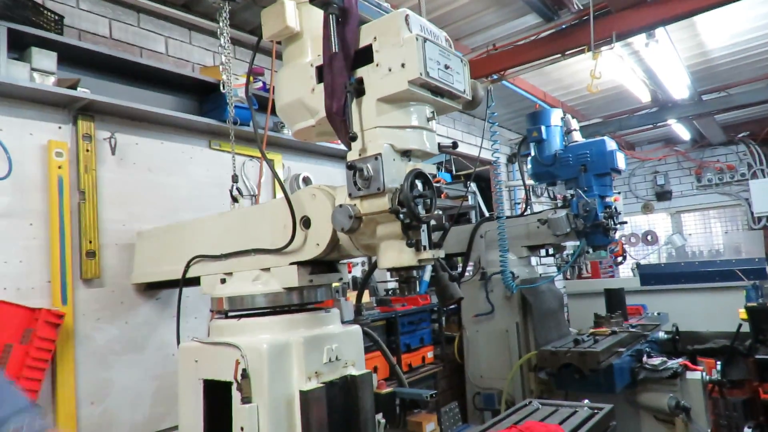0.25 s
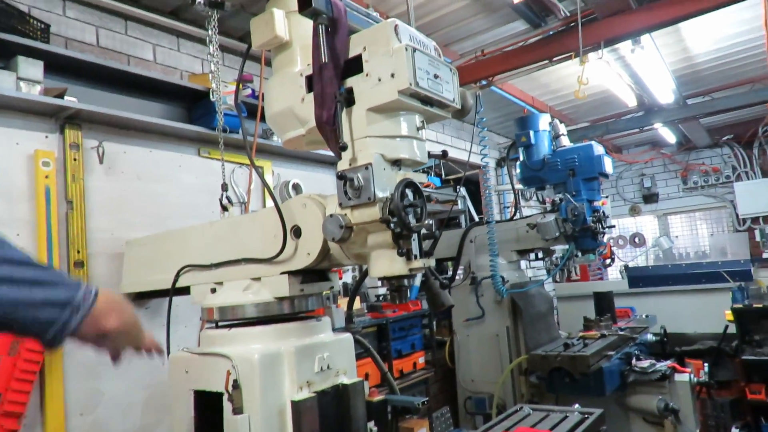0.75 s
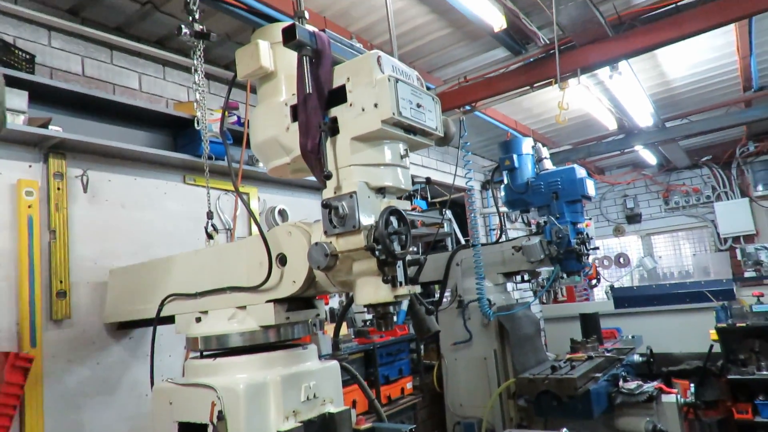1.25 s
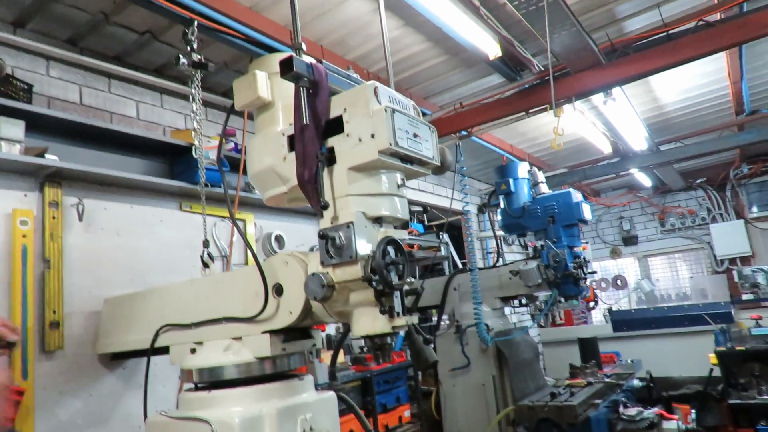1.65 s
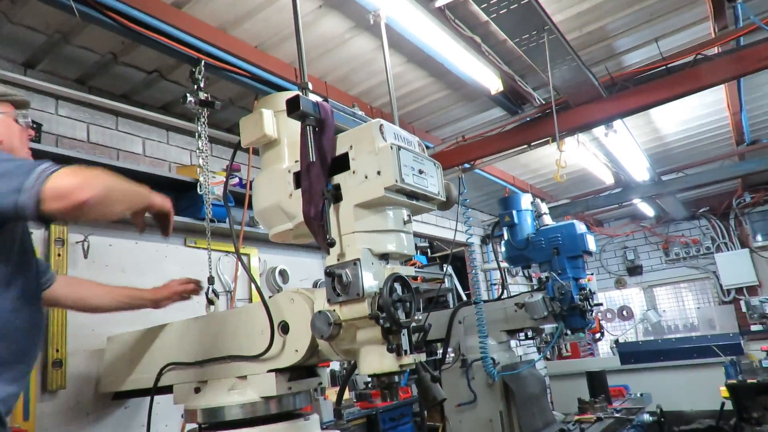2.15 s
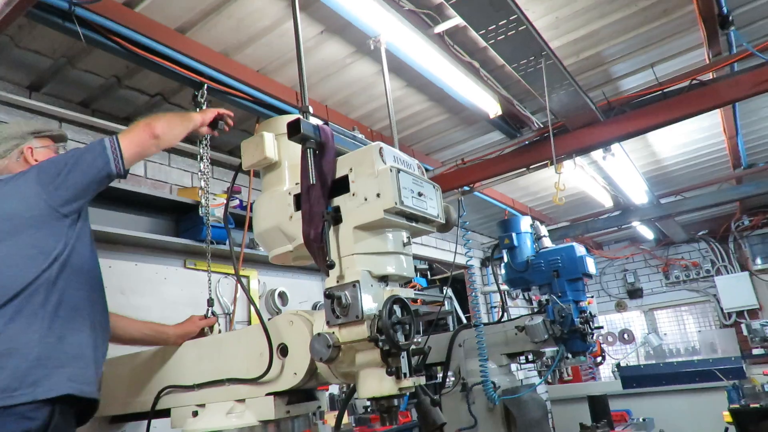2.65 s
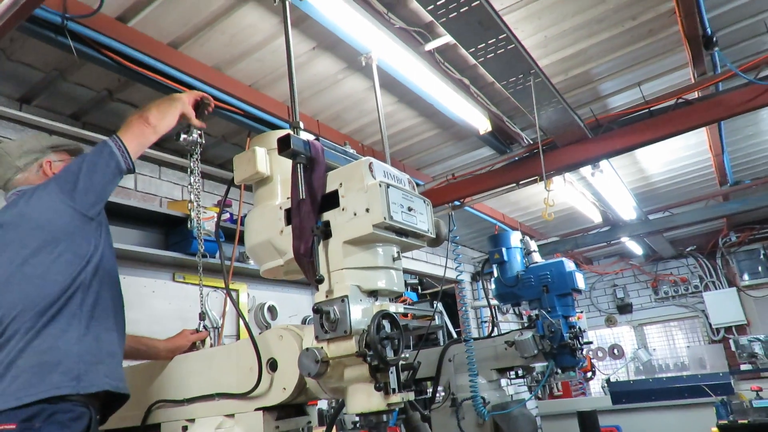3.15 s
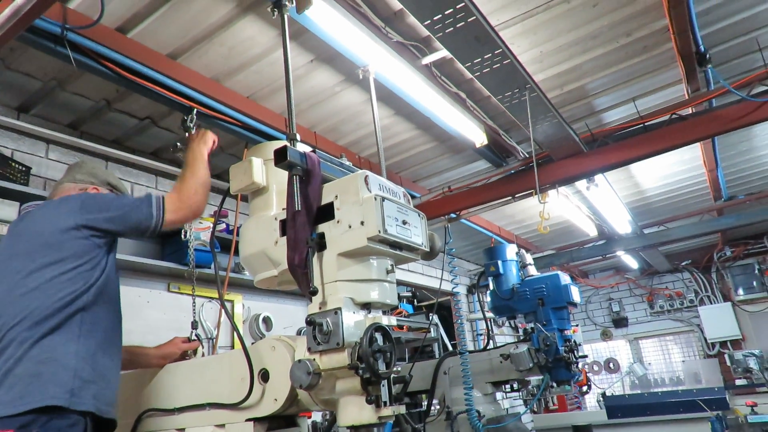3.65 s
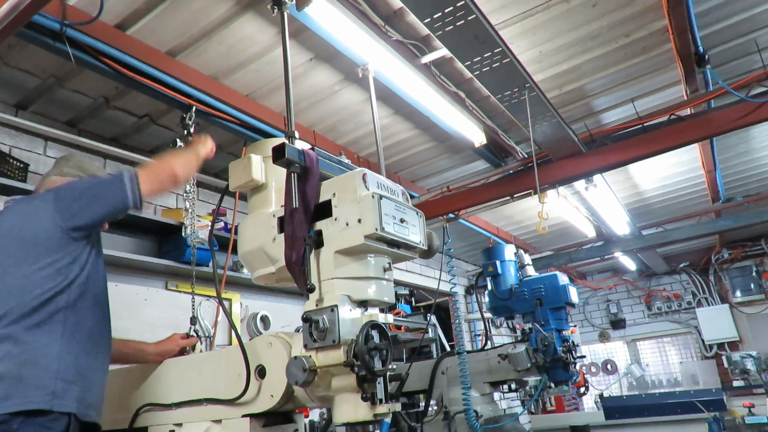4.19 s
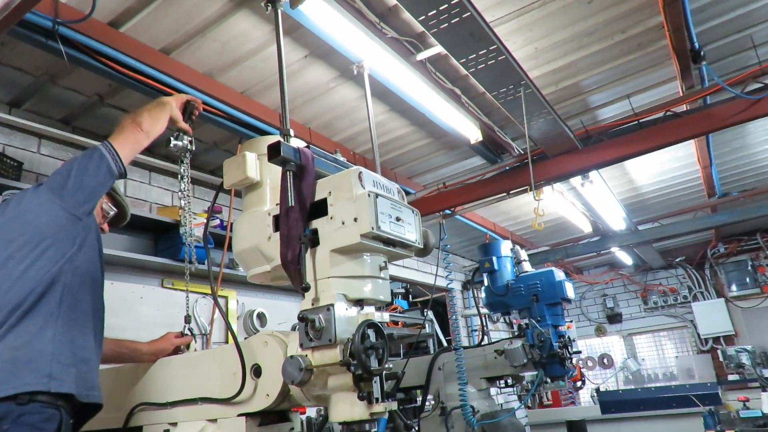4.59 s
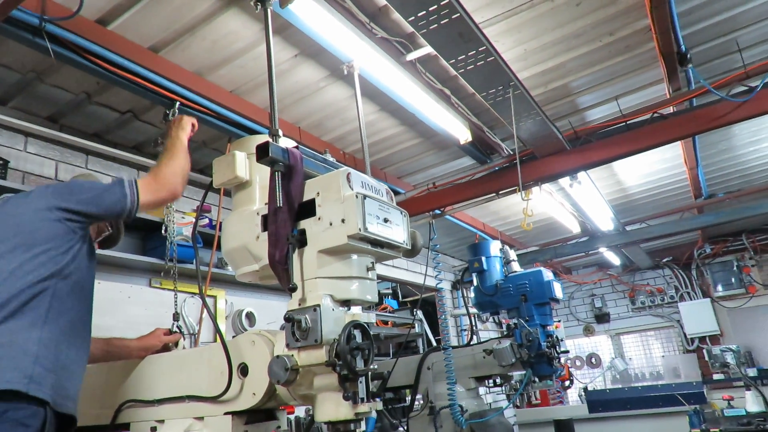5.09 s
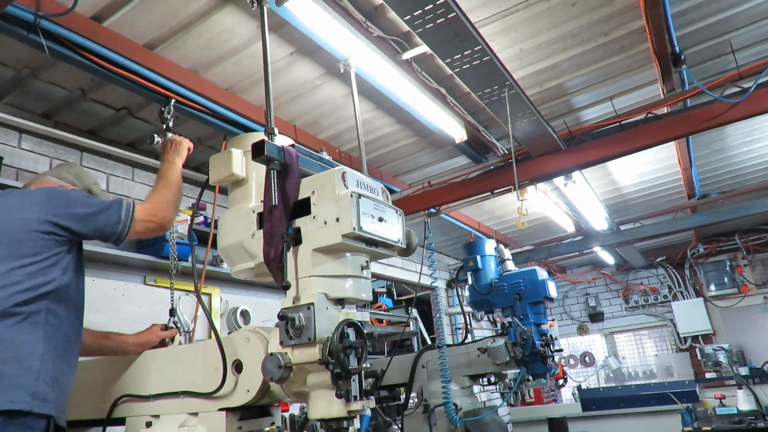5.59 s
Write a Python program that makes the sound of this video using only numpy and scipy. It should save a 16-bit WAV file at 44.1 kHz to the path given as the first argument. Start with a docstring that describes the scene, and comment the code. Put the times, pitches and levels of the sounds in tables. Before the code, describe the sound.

A hard-walled workshop with faint low strip-light hum and soft wide hiss that grow slightly. A dull knock comes at 0.25 s, then a sharper, louder one at 0.8 s, with light cloth rustle around them. At 1.4 s a muffled knock and short gritty scrape. Around 2 s a soft thud and scuff, then faint chain ticks. From 2.9 to 3.0 s chain links snap brightly, ringing briefly in the room, followed by lighter rattles to 3.5 s. At 3.75 to 3.9 s a scrape leads into a heavy hook clank, low and clangy, with a deep boom and blurred murmur-like tail. Quick sharp clicks at 4.35, 4.41 and 4.46 s, then a heavier one at 4.6 s with a low jolt. A lull, small bright chain clicks from 5.15 to 5.5 s, and a dull knock with low thump at 5.65 s. Close stereo pickup, about two metres away.

```python
"""Dull knocks come first, over hum, hiss and a low murmur; then chain links snap and a hook clanks.
A small chain hoist is worked by hand in a hard workshop, two metres from a pair of close microphones.
Each blow is a burst of noisy contact plus ringing modes; the contact spreads through the room.
Scrapes are dense ticks. Rumble, murmur, scuffs, rustle and air are coloured noise; the hum is a sine."""
import sys
import numpy as np
from scipy import signal
from scipy.fft import rfft, irfft, next_fast_len
from scipy.io import wavfile
from scipy.ndimage import uniform_filter1d

SR = 44100
rng = np.random.default_rng(int(sys.argv[2]) if len(sys.argv) > 2 else 0)


def to_wav(sig):
    """Store sig (one row per channel, or 1-D mono) as 16-bit WAV at the path in sys.argv[1].

    Samples outside -1..1 are clipped; the rate is SR.
    """
    pcm = np.clip(np.atleast_2d(sig), -1, 1) * 32767
    pcm = np.round(pcm).astype(np.int16)
    wavfile.write(sys.argv[1], SR, pcm.T)  # frames by channels


N = 257058
TIME = np.arange(N) / SR  # seconds
TAIL = np.arange(2 ** 15) / SR  # seconds after a blow


def undb(db):
    """Turn decibels into gain."""
    return 10 ** (np.asarray(db) / 20)


def unit(x):
    """Scale to rms 1."""
    return x / np.sqrt(np.mean(x ** 2))


def unit_energy(x):
    """Scale to energy 1."""
    return x / np.sqrt(np.sum(x ** 2))


def fade(t60):
    """Exponential decay, 60 dB down after t60 seconds."""
    return np.exp(-np.log(1000) * TAIL / max(t60, 1 / SR))


def read(points, hz):
    """Read between (Hz, value) points on a log-frequency axis."""
    f, value = np.transpose(points)
    return np.interp(np.log(np.maximum(hz, 1)), np.log(f), value)


def colour(x, points):
    """Filter with the gain of (Hz, dB) points; folding the cepstrum makes it respond only after its input."""
    n = next_fast_len(len(x) + 4096, True) // 2 * 2
    gain = undb(read(points, np.fft.rfftfreq(n, 1 / SR)))
    cepstrum = irfft(np.log(gain))
    cepstrum[1:n // 2] *= 2
    cepstrum[n // 2 + 1:] = 0
    response = np.exp(rfft(cepstrum))
    return irfft(rfft(x, n) * response)[:len(x)]


def split(x, edges):
    """Cut x into the parts between neighbouring band edges."""
    hz, spectrum = np.fft.rfftfreq(len(x), 1 / SR), rfft(x)
    return [irfft(spectrum * (hz >= lo) * (hz < hi), len(x)) for lo, hi in zip(edges, edges[1:])]


def walk(rate):
    """Smooth random wander with a spread near 1, drawing 'rate' new values per second."""
    k = int(SR / rate)
    steps = np.repeat(rng.standard_normal(N // k + 1), k)
    return 1.2 * uniform_filter1d(steps, k)[:N]


# How much the two microphones differ.
# Each row: frequency in Hz, gain of the difference signal in dB.
WIDTH = [(60, -64), (250, -29.5), (600, -20), (1400, -17), (2800, -15), (5500, -9), (9500, -2.5),
         (13500, 0.5)]


def ports(mid, side):
    """Two close microphones hear the same bass and differing treble."""
    return mid + np.array([[1], [-1]]) * colour(side, WIDTH)


def wash(points, db):
    """Diffuse noise of one colour, at a steady or moving level."""
    return ports(*(unit(colour(rng.standard_normal(N), points)) * undb(db) for _ in range(2)))


# Colour of the still air, then of the hiss that differs at the two microphones.
# Each row: frequency in Hz, relative level in dB.
AIR = [(20, -30), (50, -27), (100, 5), (160, -7.5), (420, -10), (900, -13), (2000, -32), (4000, -24.5),
       (8000, -31.5), (14000, -43), (16000, -80)]
HISS = [(30, -21), (110, -20), (220, -2), (450, 5), (900, -0.5), (2000, -5), (4000, -15.5), (8000, -25),
        (14000, -29), (16000, -60)]
AIR_DB = -62
HUM_HZ, HUM_DB, HUM_WAVER_DB = 99.5, -62, -0.5  # hum level before the swell
HISS_DB = -56.5  # before the swell
SWELL_RISE_DB_PER_S = 0.95
SWELL_START_DB, SWELL_SETTLE_S = -4, 0.27  # hum and hiss start softer


def background():
    """Still air, the wavering sine hum of the strip lights and a wide hiss; hum and hiss slowly grow."""
    hum = np.sqrt(2) * np.sin(2 * np.pi * HUM_HZ * TIME) * undb(HUM_DB + HUM_WAVER_DB * walk(11))
    hiss = np.array([unit(colour(rng.standard_normal(N), HISS)) for _ in range(2)])
    start_dip_db = SWELL_START_DB * np.clip(1 - (TIME / SWELL_SETTLE_S) ** 2, 0, 1)
    swell_db = SWELL_RISE_DB_PER_S * TIME + start_dip_db
    return wash(AIR, AIR_DB) + (hum + hiss * undb(HISS_DB)) * undb(swell_db)


def strokes(table):
    """Gain of rubbing strokes: each swells and dies in a rounded arch."""
    gain = 0
    for start, length_s, db in table:
        progress = np.clip((TIME - start) / length_s, 0, 1)
        gain = gain + undb(db) * np.sqrt(np.sin(np.pi * progress))
    return gain


# Level of the low rumble and murmur, including the blurred tails of blows,
# strongest just after the hook's clank.
# Each row: time in seconds, rumble in dB, murmur in dB (both before the trims below).
MURMUR_LEVELS = [(0.0, -92, -60.5), (0.36, -85, -50.5), (2.74, -68.5, -56), (2.99, -63.5, -47),
                 (3.7, -73, -57), (3.98, -53, -25.5), (4.07, -60.5, -44.5), (5.45, -63, -45.5),
                 (5.83, -55.5, -47)]
# Soft scuffs, then sleeves rustling as the arms reach.
# Each row: start in seconds, length in seconds, level in dB before the noise wavers.
SCUFFS = [(0.553, 0.072, -49.5), (2.06, 0.11, -39), (3.745, .11, -39.5), (4.47, 0.11, -38.5),
          (4.65, 0.25, -49), (5.15, 0.213, -46)]
RUSTLES = [(0.33, 0.64, -54), (1.55, 0.37, -58), (2.0, 0.45, -55), (3.02, 0.096, -43), (4.49, 0.13, -40)]
# Colours of the rumble (the load booms with it too), the murmur (scuffs share it) and the rustle.
# Each row: frequency in Hz, relative level in dB.
RUMBLE = [(20, -15), (40, -14), (56, -16.5), (71, -2.5), (85, -6.5), (125, -2.5), (160, -9), (220, -7),
          (500, -67)]
MURMUR = [(90, -29.5), (170, 1), (250, 4), (360, 2.5), (550, -2.5), (900, -12.5), (2500, -70)]
RUSTLE = [(400, -4.5), (900, 7), (2000, 0.5), (4000, -6.5), (8000, -17.5), (15000, -23)]
RUMBLE_TRIM_DB, MURMUR_TRIM_DB, RUSTLE_TRIM_DB = 10.5, -3.5, -12


def murmur():
    """Uneven coloured noise: low rumble and murmur with blurred tails of blows, scuffs and sleeves."""
    s, *columns = np.transpose(MURMUR_LEVELS)
    rumble_db, murmur_db = (np.interp(TIME, s, c) for c in columns)
    rumble = wash(RUMBLE, rumble_db + RUMBLE_TRIM_DB + 1.7 * walk(27))
    murmur_gain = undb(murmur_db + MURMUR_TRIM_DB) + strokes(SCUFFS)
    murmur_and_scuffs = murmur_gain * wash(MURMUR, 1.84 * walk(50))
    # brighter noise follows the murmur's level, besides the sleeve strokes
    rustle_gain = undb(murmur_db + RUSTLE_TRIM_DB) + strokes(RUSTLES)
    rustle = rustle_gain * wash(RUSTLE, 2.33 * walk(25.21))
    return rumble + murmur_and_scuffs + rustle


# The heavy load is jolted.
# Each row: start in seconds, level in dB before the noise wavers.
JOLTS = [(1.965, -52), (3.865, -33), (4.02, -41), (4.62, -38), (5.66, -42.5)]
JOLT_ATTACK_S, JOLT_HOLD_S, JOLT_FALL_DB_PER_S = 0.03, 0.03, 87


def load():
    """Each jolt of the load booms as low noise, holds for a moment and dies away."""
    gain = 0
    for s, db in JOLTS:
        attack = np.clip((TIME - s) / JOLT_ATTACK_S, 0, 1)
        falling_s = np.maximum(TIME - s - JOLT_ATTACK_S - JOLT_HOLD_S, 0)
        gain = gain + attack * undb(db - JOLT_FALL_DB_PER_S * falling_s)
    return gain * wash(RUMBLE, 0.5 * walk(14))


# How long the workshop reverberates.
# Each row: frequency in Hz, time to fall by 60 dB in seconds.
ROOM_T60 = [(100, 0.39), (400, 0.44), (1000, 0.36), (2700, 0.43), (7000, 0.32), (14000, 0.23)]


def room_decay():
    """Octave edges, and how the reverberation fades in each octave."""
    edges = np.r_[0, 180 * 2 ** np.arange(7), SR / 2]
    return edges, np.array([fade(t60) for t60 in read(ROOM_T60, edges[1:] / np.sqrt(2))])


def workshop(direct_db, early_db, early_s):
    """Paths from one spot: straight, off nearby machines and walls, then a diffuse tail that builds up."""
    edges, decay = room_decay()
    octaves = split(rng.standard_normal(len(TAIL)), edges)
    diffuse = np.sum(octaves * decay, axis=0) * (1 - fade(0.052))
    # about 1800 scattered reflections a second, dying away
    reflected = rng.random(len(TAIL)) < 1800 / SR
    early = rng.standard_normal(len(TAIL)) * reflected * fade(early_s)
    response = unit_energy(diffuse) + undb(early_db) * unit_energy(early)
    response[0] += undb(direct_db)
    return unit_energy(response)


# Slack chain and fittings dragged over metal.
# Each row: start in seconds, length in seconds, level of the ticks in dB before body and room.
SCRAPES = [(1.351, 0.11, -47), (1.439, 0.14, -38.5), (2.059, 0.052, -52), (2.719, 0.24, -51.5),
           (3.205, 0.087, -49), (3.577, 0.036, -53.5), (3.785, 0.086, -40), (4.07, 0.034, -36.5),
           (4.28, 0.2, -49), (4.834, 0.024, -48), (4.885, 0.045, -52)]
# Colour of the scraping. Each row: frequency in Hz, relative level in dB.
SCRAPE = [(120, -31), (350, 6), (900, 7.5), (2200, 7), (4500, -3.5), (7000, -12), (13500, -19.5),
          (15500, -41)]


def scrapes():
    """Metal catches and slips in dense uneven ticks that the room smears."""
    ticks = np.zeros(N)
    for s, length_s, db in SCRAPES:
        n = int(length_s * SR)
        caught = rng.random(n) < 700 / SR  # about 700 ticks a second
        slips = rng.standard_normal(n) * caught * signal.windows.tukey(n, .5)
        i = int(s * SR)
        ticks[i:i + n] += unit(slips) * undb(db)
    body = unit_energy(colour(signal.unit_impulse(1024), SCRAPE))
    sound = signal.fftconvolve(ticks, body)
    place = dict(direct_db=-4, early_db=7, early_s=0.13)
    return ports(*(signal.fftconvolve(sound, workshop(**place))[:N] for _ in range(2)))


# Edges in Hz of the five registers: thump, body, clang, clink, tick.
BAND_EDGES = [50, 200, 750, 1400, 5000, 15000]


def blow(band_db, chatter_s, ring_db, striker_hz, modes, crack, paths):
    """One contact chatters for a moment and rings the modes, each by the place where it is struck."""
    contact = unit_energy(rng.laplace(size=len(TAIL)) * fade(chatter_s))
    contact[0] += .8
    # the part that strikes adds one damped resonance of its own
    contact = contact + .8 * signal.lfilter(*signal.iirpeak(striker_hz, 14, fs=SR), contact)
    contact = colour(unit_energy(contact), crack)
    # a random strength for each mode stands for the place struck
    strength = undb(ring_db + 2.0 * rng.standard_normal(len(modes)))

    def arrival():
        """The crack spreads through the room; each mode arrives in its own phase."""
        ring = 0
        for gain, (hz, db, t60) in zip(strength, modes):
            tone = np.sin(2 * np.pi * (hz * TAIL + rng.random())) * fade(t60)
            ring = ring + gain * undb(db) * unit_energy(tone)
        spread = signal.fftconvolve(contact, workshop(*paths))[:len(TAIL)]
        return spread + ring * (1 - fade(0.034))

    mid, side = arrival(), arrival()
    # force and hardness of the contact set how strong each register starts
    attack = int(.025 * SR)
    start_db = [10 * np.log10(np.mean(part[:attack] ** 2)) for part in split(mid, BAND_EDGES)]
    centres = np.sqrt(np.multiply(BAND_EDGES[1:], BAND_EDGES[:-1]))
    hardness = np.c_[centres, np.subtract(band_db, start_db)]
    return np.array([colour(mid, hardness), colour(side, hardness)])


RING_DB_PER_LEVEL_DB, AVERAGE_BLOW_DB = 0.21, -22.5  # stronger blows set the modes ringing more


def blows(table, modes, crack, voice_db, clang_share, ring_db, direct_db, early_db, early_s):
    """All blows on one object: weight brings in the lower registers, hardness the tick."""
    out = np.zeros((2, N + len(TAIL)))
    paths = direct_db, early_db, early_s
    for s, db, weight_db, hard_db, chatter_s, striker_hz in table:
        # a light touch sounds mostly in the clink, which neither changes
        tilt_db = [weight_db, weight_db, clang_share * weight_db, 0, hard_db]
        band_db = db + np.add(voice_db, tilt_db)
        force_db = RING_DB_PER_LEVEL_DB * (band_db.max() - AVERAGE_BLOW_DB)
        i = int(s * SR)
        sound = blow(band_db, chatter_s, ring_db + force_db, striker_hz, modes, crack, paths)
        out[:, i:i + len(TAIL)] += sound
    return ports(*out[:, :N])


# Duller knocks on bench and machine casing.
# Each row: start in seconds, level in dB before the voice below, weight in dB, hardness in dB,
# chatter decay in seconds, note of the striking part in Hz.
KNOCKS = [(0.169, -40.5, -0.5, -9, 0.099, 264), (0.258, -22.5, -21.5, -8.5, 0.042, 1780),
          (0.809, -13, -9, 3.5, 0.016, 2580), (1.409, -29, 2, 0.5, 0.047, 370),
          (1.969, -44.5, 17.5, -2, 0.12, 400), (2.399, -48, 5.5, 0.5, 0.018, 427),
          (5.631, -28, -4.5, -4.5, 0.096, 1150)]
# Modes of the casing. Each row: frequency in Hz, relative level in dB, 60 dB decay in seconds.
CASING = [(185.5, -3.5, 0.25), (293.5, 4.5, 0.18), (332, 8, 0.16), (378.5, 9.5, 0.069), (490, 2.5, 0.12),
          (572, 5, 0.24), (725, 2, 0.14), (1070, -5, 0.35), (1206, -3, 0.17), (1530, 1, 0.23),
          (1770, -18, 0.084), (2250, -12, 0.15), (2650, -10, 0.38)]
# Colour of the contact noise. Each row: frequency in Hz, relative level in dB.
CASING_CRACK = [(40, -33), (110, -8), (180, -5), (330, -4.5), (480, 0.5), (700, 2), (1500, 4.5), (2000, -1),
                (2700, -3), (4500, 0), (6000, -5.5), (8000, -9), (10000, -16), (13000, -21), (15500, -35)]
# Registers before weight and hardness: thump, body, clang, clink and tick in dB.
KNOCK_VOICE = [-19, 2, -5.5, -2.5, -23]
KNOCK_CLANG_SHARE = 0.11  # dB of clang per dB of weight


def knocks():
    """Blows on the casing, with strong reflections from the wall beside it."""
    near = dict(direct_db=-14, early_db=2, early_s=.1)
    return blows(KNOCKS, CASING, CASING_CRACK, KNOCK_VOICE, KNOCK_CLANG_SHARE, ring_db=-29.5, **near)


# The hook seats under load.
# Each row: start in seconds, level in dB before the voice below, weight in dB, hardness in dB,
# chatter decay in seconds, note of the striking part in Hz.
CLANKS = [(3.762, -25, -8, 4.5, 0.056, 1160), (3.862, -17.5, 2.5, -0.5, 0.017, 1160),
          (3.897, -16.5, -2, -8, 0.023, 950)]
# Modes of the hook and lifting eye.
# Each row: frequency in Hz, relative level in dB, 60 dB decay in seconds.
HOOK = [(269, -14, 0.4), (385, -24, 0.62), (910, 3, 0.57), (956, -0.5, 0.61), (1011, 7.5, 0.23),
        (1044, 1.5, 0.25), (1195, 13, 0.14), (1130.6, 0.5, 0.61), (1642, -15, 0.26), (1981, -2, 0.65),
        (2560, -2.5, 0.7), (3050, -2, 0.68), (4200, -9, 0.54)]
# Colour of the contact noise. Each row: frequency in Hz, relative level in dB.
HOOK_CRACK = [(40, -30), (100, 4), (600, 5.5), (790, 2.5), (1000, 10.5), (1200, 0.5), (1430, -1),
              (1950, 5.5), (2350, -4), (2650, 0.5), (4500, -9), (7000, -19.5), (14000, -24), (16000, -36)]
# Registers before weight and hardness: thump, body, clang, clink and tick in dB.
CLANK_VOICE = [-18, -11, 0, -7.5, -11]
CLANK_CLANG_SHARE = 1  # dB of clang per dB of weight


def hook():
    """The hook slips and seats, ringing its steel modes with a low clang."""
    place = dict(direct_db=-9.5, early_db=-1.5, early_s=0.15)
    return blows(CLANKS, HOOK, HOOK_CRACK, CLANK_VOICE, CLANK_CLANG_SHARE, ring_db=-19.5, **place)


# Links snap over the wheel.
# Each row: start in seconds, level in dB before the voice below, weight in dB, hardness in dB,
# chatter decay in seconds.
CLICKS = [(0.731, -49, -32, 12, 0.059), (1.632, -63, -10, 16, .01), (2.179, -41, 5.5, -27, 0.029),
          (2.703, -41.5, 8, -14.5, 0.18), (2.798, -39, 2, -7, 0.08), (2.883, -20, -2.5, 2.5, 0.061),
          (2.976, -27, -3, -9, 0.068), (2.995, -21.5, 1.5, 6, 0.016), (3.197, -35.5, 5.5, 4.5, 0.063),
          (3.261, -34, -1.5, -16, .06), (3.505, -52, 7, 0.5, 0.06), (3.712, -47.5, 0, 6, 0.42),
          (3.926, -28.5, -4, -6, 0.053), (3.989, -32, 4, 13, 0.023), (4.245, -41, -12, -3, 0.082),
          (4.278, -39.5, -19, -4, 0.029), (4.352, -18, -2.5, 3.5, 0.036), (4.408, -17, -8, 2.5, 0.017),
          (4.455, -17, 0.5, 0, 0.013), (4.59, -21.5, 6, -0.5, 0.076), (5.136, -38.5, 4, -11, 0.083),
          (5.18, -28.5, -10, 8, 0.085), (5.32, -30.5, 5.5, 9.5, .03), (5.487, -38, -5, 11, 0.062),
          (5.498, -30.5, -3, 8, 0.063)]
# Modes of hoist frame, hook and links.
# Each row: frequency in Hz, relative level in dB, 60 dB decay in seconds.
STEEL = [(259.8, -5, 0.84), (461, 1, 0.49), (627, 0, 1), (940, -6, 0.75), (1009, -6, 0.48),
         (1191, 2.5, 0.42), (1354, -25, 0.2), (1540, 3, 0.25), (1750, -7, 0.29), (1750, -4, 0.44),
         (2591, 4.5, 0.69), (2540, -1, 0.81), (3009, -1.5, 0.55), (3470, 4, 0.41), (3800, -5, 0.29),
         (3980, 5, 0.091), (4940, 8, 0.13), (6340, -22, .28), (8670, 0, 0.23), (10200, -14, 0.2)]
# Colour of the contact noise. Each row: frequency in Hz, relative level in dB.
STEEL_CRACK = [(40, -31), (100, 4), (400, -3.5), (650, -1.5), (800, -11.5), (1000, 2), (1400, -3),
               (1800, 0.5), (2800, -2), (5000, 1), (7000, -2), (11000, -1), (14500, -4.5), (16000, -34)]
# Registers before weight and hardness: thump, body, clang, clink and tick in dB.
CLICK_VOICE = [-34, -9.5, -10, -2, -15]
CLICK_CLANG_SHARE = 0.14  # dB of clang per dB of weight
LINK_HZ, LINK_SPREAD = 1730, 0.028  # every link has nearly the same note


def hoist():
    """Links snap over the wheel and ring the steel, up by the roof where the room dominates."""
    links = [(*row, LINK_HZ * np.exp(LINK_SPREAD * rng.standard_normal())) for row in CLICKS]
    place = dict(direct_db=-17.5, early_db=-1.0, early_s=0.095)
    return blows(links, STEEL, STEEL_CRACK, CLICK_VOICE, CLICK_CLANG_SHARE, ring_db=-27.5, **place)


def scene():
    """Everything the two microphones hear."""
    return background() + murmur() + load() + scrapes() + knocks() + hook() + hoist()


TOP_HZ = 15400


def record(dry):
    """Round the highest peaks softly and cut the treble above TOP_HZ."""
    rounded = 2 * np.tanh(dry / 2)
    treble_cut = signal.ellip(8, .2, 70, TOP_HZ, fs=SR, output="sos")
    return signal.sosfilt(treble_cut, rounded)


dry = scene()
out = record(dry)
to_wav(out)
```